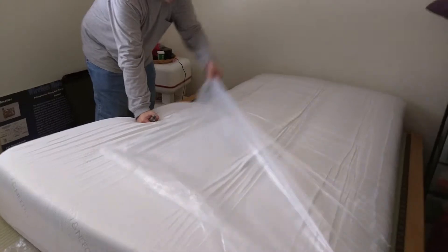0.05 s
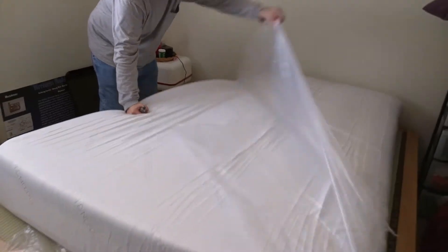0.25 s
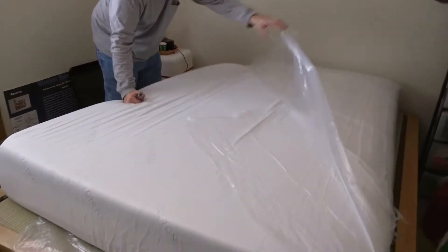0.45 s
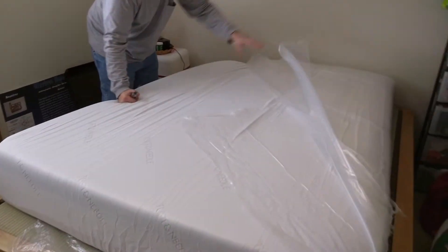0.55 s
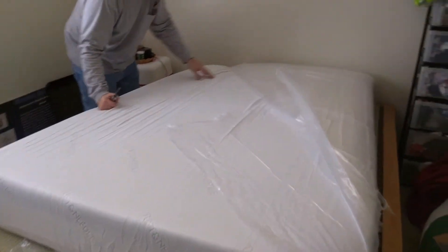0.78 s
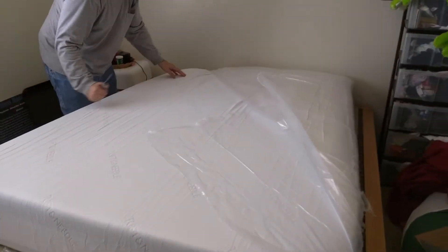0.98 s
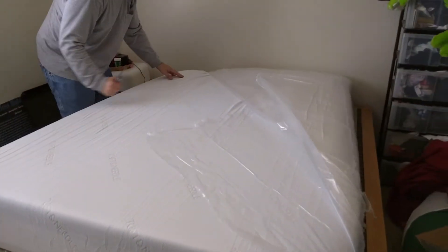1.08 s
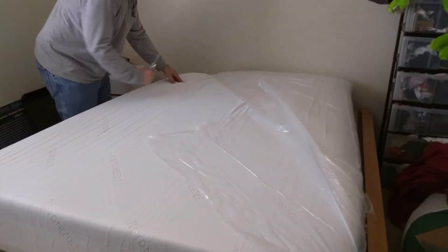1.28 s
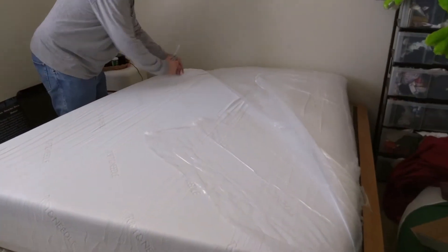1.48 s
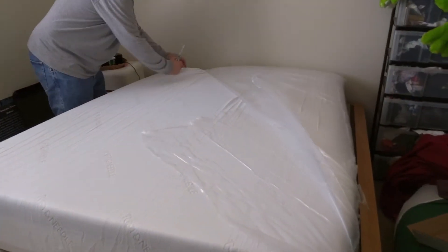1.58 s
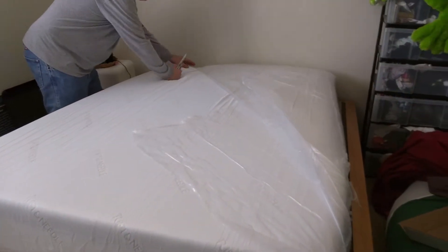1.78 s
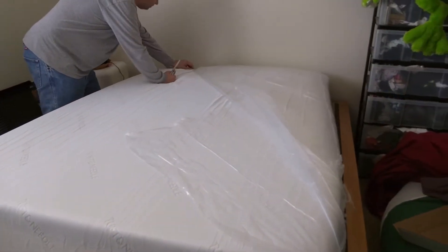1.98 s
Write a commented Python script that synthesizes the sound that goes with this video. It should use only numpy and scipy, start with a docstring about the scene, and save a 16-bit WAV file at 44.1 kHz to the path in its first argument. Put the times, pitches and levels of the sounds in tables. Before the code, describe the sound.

Plastic film crinkles and snaps taut as it is pulled quickly across a mattress, then sinks down with a fine, fading crackle. A few faint hand pats and ticks follow over a low hum in a small room.

```python
"""A sheet of thin plastic film is whipped off a mattress in a small, quiet room.
It swishes over the fabric, its folds buckle, and it pushes air as it flaps and cracks taut.
Then it settles with a long fizzing hiss, made of thousands of tiny creases flipping.
Hands tick, pat and rub on the wrap; mains hum and a deep machine throb lie underneath."""
import sys
import numpy as np
from scipy import signal
from scipy.fft import rfft, irfft, next_fast_len
from scipy.io import wavfile

SR = 44100
rng = np.random.default_rng(int(sys.argv[2]) if len(sys.argv) > 2 else 0)


def store_wav(level_fs):
    """Save 16-bit WAV to argv[1]."""
    pcm = np.round(np.clip(np.atleast_2d(level_fs), -1, 1) * 32767)
    wavfile.write(sys.argv[1], SR, pcm.T.astype(np.int16))


N = 90404
T = np.arange(N) / SR


def from_db(db):
    """Turn decibels (dB) into a number to multiply a sound by."""
    return 10 ** (np.asarray(db) / 20)


def rms_one(x):
    """Scale a sound so that its average power is one."""
    return x / np.sqrt(np.mean(x ** 2) + 1e-20)


def level(rows):
    """A loudness curve that joins rows of time in seconds and level in dB."""
    return from_db(np.interp(T, *np.transpose(rows)))


def colour(x, points):
    """Make some frequencies stronger and others weaker; plain noise keeps about the same power."""
    size = 2 * next_fast_len(N)
    hz, db = np.transpose(points)
    log_hz = np.log(np.fft.rfftfreq(size, 1 / SR) + 1)
    gain = rms_one(from_db(np.interp(log_hz, np.log(hz), db)))
    # These steps make the filter ring only after a click, never before it.
    cepstrum = irfft(np.log(gain))
    cepstrum[1:size // 2] *= 2
    cepstrum[size // 2 + 1:] = 0
    return irfft(rfft(x, size) * np.exp(rfft(cepstrum)))[:N]


def clicks(per_s, spread_db):
    """Clicks at random times, many small and a few large, with an average power of one."""
    sizes = from_db(spread_db * np.minimum(rng.exponential(1, N), 4))
    signs = rng.choice([-1, 1], N)
    happens = rng.random(N) < per_s / SR
    return rms_one(sizes * signs * happens)


def burst(start, attack, hold, release):
    """A curve that rises, then fades once `hold` has passed since the start; all in seconds."""
    age = T - start
    return np.clip(age / attack, 0, 1) * np.exp(-np.maximum(age - hold, 0) / release)


def fizz():
    """Thousands of tiny creases flip each second as the film slides and settles."""
    # Each row: time in seconds, relative level in dB.
    loudness = [(0, -50), (.06, -52.5), (.085, -48), (.17, -48), (.2, -44), (.215, -33), (.29, -31.5),
                (.37, -23.5), (.45, -25.5), (.53, -27), (.62, -30), (.77, -37.5), (.92, -38), (1.05, -41),
                (1.5, -43), (1.62, -45.5), (1.85, -48.5), (2.05, -49)]
    # Each row: frequency in Hz, boost or cut in dB.
    tone = [(300, -11), (800, -11), (1400, -3.5), (2170, 1.5), (3000, -1.5), (4400, -7.5), (5500, -4.5),
            (6700, -5), (8000, 2.5), (9200, 3), (11300, 2), (13000, -1.5), (15500, -2.5)]
    creases = clicks(per_s=11000, spread_db=2.5)
    return colour(from_db(1.74) * level(loudness) * creases, tone)


def swish():
    """Film drags over fabric, and the friction makes a smooth hiss."""
    # Each row: time in seconds, relative level in dB.
    loudness = [(0, -48.5), (.06, -50.5), (.09, -48.5), (.18, -43), (.24, -55), (.3, -27.5), (.38, -32),
                (.44, -41), (.5, -29), (.55, -30.5), (.61, -65), (.75, -62), (2.05, -68)]
    # Each row: frequency in Hz, boost or cut in dB.
    tone = [(300, -33), (900, -7), (2000, -19.5), (3100, 1), (4500, -5), (7000, -4.5), (10000, -11),
            (15000, -14)]
    return colour(from_db(-1.5) * level(loudness) * rng.standard_normal(N), tone)


def background():
    """A very deep machine throb, mains hum and the soft noise of the air in the room."""
    # Each row is a steady tone: frequency in Hz, level in dB.
    steady_tones = [(18.4, -35), (59.6, -49), (241, -67)]
    # A buzz wavers an octave above the hum. Each row: time in seconds, level in dB.
    buzz_loudness = [(0, -48.5), (.15, -58.5), (.85, -54), (1.05, -70), (1.28, -47), (1.52, -62),
                     (1.7, -52.5), (1.92, -64.5), (2.05, -48.5)]
    # Each row: frequency in Hz, boost or cut in dB.
    air_tone = [(25, 10.5), (75, -8), (140, -11), (280, -14), (500, -22), (1000, -22), (2500, -29.5),
                (6000, -21), (15000, -34.5)]
    buzz_hz = 119.6
    tones = [(hz, from_db(db)) for hz, db in steady_tones] + [(buzz_hz, level(buzz_loudness))]
    hum = sum(gain * np.sqrt(2) * np.sin(2 * np.pi * (hz * T + rng.random())) for hz, gain in tones)
    air = from_db(-45) * colour(rng.standard_normal(N), air_tone)
    return hum + air


def crumple():
    """Larger folds buckle while the sheet swings through the air."""
    # Each row: time in seconds, level in dB.
    loudness = [(0, -77), (.15, -48), (.2, -36), (.23, -31.5), (.28, -32.5), (.32, -23.5), (.38, -23),
                (.44, -25), (.47, -26), (.53, -26), (.565, -28.5), (.635, -32.5), (.7, -41), (.77, -53.5),
                (.85, -48.5), (1.05, -52.5), (2.05, -62.5)]
    # Each row: frequency in Hz, boost or cut in dB.
    tone = [(35, -1), (60, -2), (110, 2), (165, -1.5), (250, -3.5), (330, -3.5), (480, -6), (620, -7),
            (800, -3), (1200, -8), (2000, -8), (3000, -13.5), (4500, -13), (8000, -23), (15000, -15)]
    return colour(level(loudness) * clicks(per_s=1400, spread_db=1), tone)


def ticks():
    """Single creases snap over, and each rings for a moment."""
    # Each row: start in seconds, starting level in dB, pitch in Hz, fade time in seconds.
    snaps = [(.076, -27, 7400, .0005), (.301, -9, 1920, 0.0011), (0.3142, -5.5, 7730, 0.00045),
             (0.3375, -9, 8000, 0.00027), (0.356, -7.5, 6730, 0.0006), (0.378, -15, 11100, .0003),
             (0.395, -5, 8600, 0.0003), (.93, -20.5, 5900, 0.00019), (1.529, -24, 2270, 0.00085),
             (1.869, -44, 2070, 0.0054), (1.879, -44, 2090, .005), (1.976, -28, 6100, 0.00028)]
    out = 0
    for start, db, hz, fade in snaps:
        ring = np.sin(2 * np.pi * hz * (T - start))
        out += from_db(db) * ring * burst(start, attack=1 / SR, hold=0, release=fade)
    return out


def pats():
    """Hands pat the padded top of the mattress with soft, dull thuds."""
    # Each row: start in seconds, level in dB.
    touches = [(.08, -50), (0.837, -48.5), (0.994, -49), (1.16, -54), (1.422, -47.5)]
    # Each row: frequency in Hz, boost or cut in dB.
    tone = [(100, -9), (270, 15), (480, 3), (700, 12.5), (1000, -9), (4000, -47)]
    force = sum(from_db(db) * burst(start, attack=0.0025, hold=0.0035, release=0.033)
                for start, db in touches)
    return colour(force * rng.standard_normal(N), tone)


def air_rumble():
    """Swirling air rumbles as the sheet swings and dies away as it lands."""
    # Each row: frequency in Hz, boost or cut in dB.
    tone = [(15, -16), (35, -1), (85, -13), (130, -9.5), (400, -45), (1500, -60)]
    swing = burst(start=0.18, attack=0.16, hold=0.35, release=0.05)
    return colour(from_db(-34) * swing * rng.standard_normal(N), tone)


def flaps():
    """Each flap of the sheet is a push of air followed by a suck."""
    # Each row: time of the flap's middle in seconds, relative level in dB, pitch in Hz.
    pushes = [(0.203, -31, 44.8), (.3, -15.5, 196), (.353, -11, 326), (0.368, -19, 69.4),
              (.389, -17.5, 172), (0.431, -36, 85), (0.525, -18.5, 64), (.586, -26, 50)]
    width_cycles = 0.6
    out = 0
    for middle, db, hz in pushes:
        cycles = (T - middle) * hz
        swell = np.exp(-(cycles / width_cycles) ** 2)
        out -= from_db(db) * np.sin(2 * np.pi * cycles) * swell
    return out


def cracks():
    """Each jerk pulls the sheet taut with a quick run of loud buckles; big folds sound duller."""
    # Each row: start in seconds, relative level in dB, length in seconds, treble cutoff in Hz.
    jerks = [(.228, -33.5, 0.011, 1390), (0.2968, -16, .003, 2620), (.3, -22, 0.0083, 2200),
             (0.3061, -19.5, 0.0078, 7150), (0.347, -18.5, 0.0056, 4000), (0.35, -18, 0.015, 3220),
             (0.362, -16, 0.0051, 11000), (0.372, -22.5, 0.017, 11100), (0.387, -21.5, 0.016, 6900),
             (0.525, -24.5, 0.0039, 4500), (0.586, -22.5, 0.0056, 3500), (0.63, -33.5, 0.0026, 2520)]
    # Each row: frequency in Hz, boost or cut in dB.
    tone = [(70, -17.5), (170, -0.5), (250, -2), (330, 6.5), (500, -0.5), (900, -8.5), (1300, -6.5),
            (1900, -2), (3000, -8), (5000, -13), (8000, -7), (15000, -22.5)]
    out = 0
    for start, db, length, cutoff_hz in jerks:
        force = burst(start, attack=0.00042, hold=length, release=0.0042)
        buckles = rms_one(force * clicks(per_s=3500, spread_db=3.5))
        buckles *= np.sqrt(np.mean(force ** 2))  # the same power however the clicks fall
        treble_cut = signal.butter(2, cutoff_hz, fs=SR)
        out += from_db(db) * signal.lfilter(*treble_cut, buckles + 1e-18)
    return colour(out, tone)


def rubs():
    """Fingers rub the wrap in brief, grainy strokes."""
    # Each row: start in seconds, level in dB, length in seconds.
    strokes = [(0.825, -43, 0.0052), (1.533, -51, 0.012), (1.875, -54, 0.025), (1.976, -48.5, 0.021)]
    # Each row: frequency in Hz, boost or cut in dB.
    tone = [(600, -31), (1400, -1), (2100, 2), (3000, -2), (4500, -8), (7000, -22), (15000, -33)]
    force = sum(from_db(db) * burst(start, attack=0.0023, hold=length, release=0.0099)
                for start, db, length in strokes)
    return colour(force * clicks(per_s=12000, spread_db=1), tone)


def room(x):
    """Nearby walls send back a short wash of echoes, and waves caught between them ring at low notes."""
    # Each row: pitch of a room note in Hz, its strength in dB.
    notes = [(166, 2.5), (195, -9), (241, -4), (321, -6.5), (344, -1), (487, -1), (549, -12), (717, -9)]
    fade_60_db_s, first_echo_s, note_width_hz = 0.29, 0.0031, 22
    fade = from_db(-60 * T / fade_60_db_s) * (T > first_echo_s)
    tail = clicks(per_s=4500, spread_db=3) * fade
    echoes = signal.fftconvolve(x, tail / np.linalg.norm(tail))[:N]
    ringing = sum(from_db(db) * signal.lfilter(*signal.iirpeak(hz, hz / note_width_hz, fs=SR), x)
                  for hz, db in notes)
    return from_db(-10) * echoes + ringing


def scene():
    """Film and hands echo in the room; moving air and the background join them in one channel."""
    film = fizz() + swish() + crumple() + ticks() + pats() + cracks() + rubs()
    return (film + room(film) + air_rumble() + flaps() + background())[None]


def record(dry):
    """Round off the loudest peaks and cut the very highest treble."""
    ceiling, cutoff_hz = 0.8, 15750
    rounded = ceiling * np.tanh(dry / ceiling)
    treble_cut = signal.ellip(12, 0.1, 80, cutoff_hz, fs=SR, output="sos")
    return signal.sosfilt(treble_cut, rounded)


dry = scene()
out = record(dry)
store_wav(out)
```